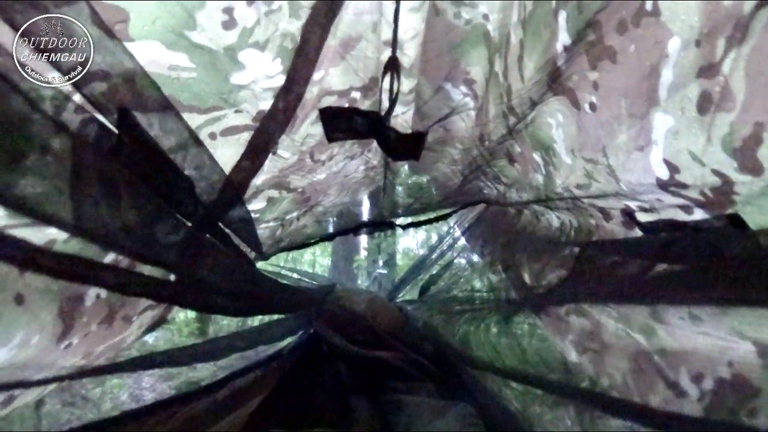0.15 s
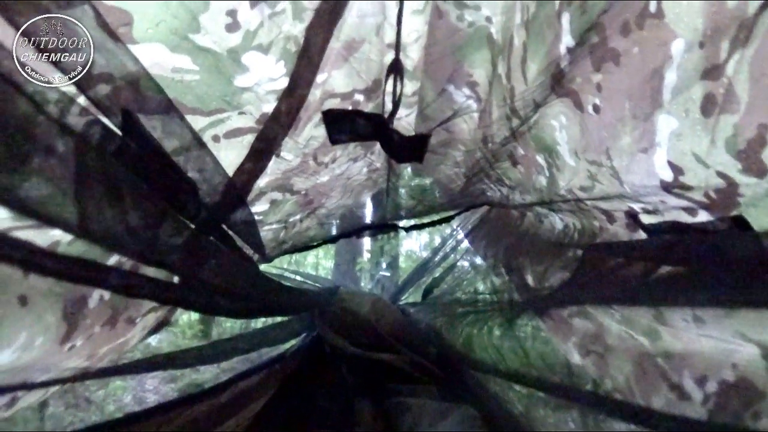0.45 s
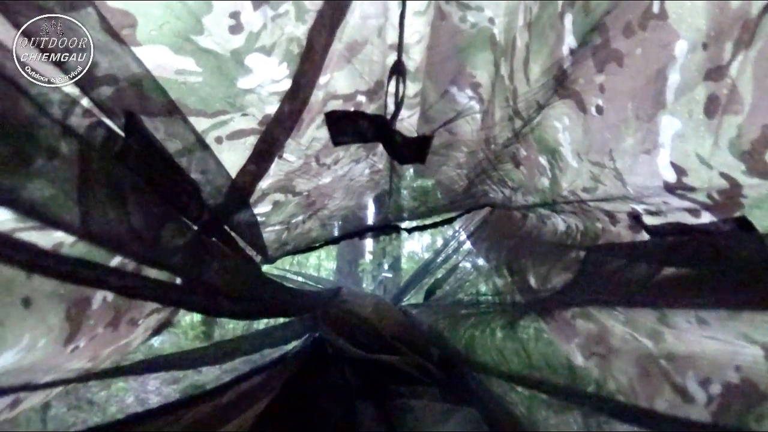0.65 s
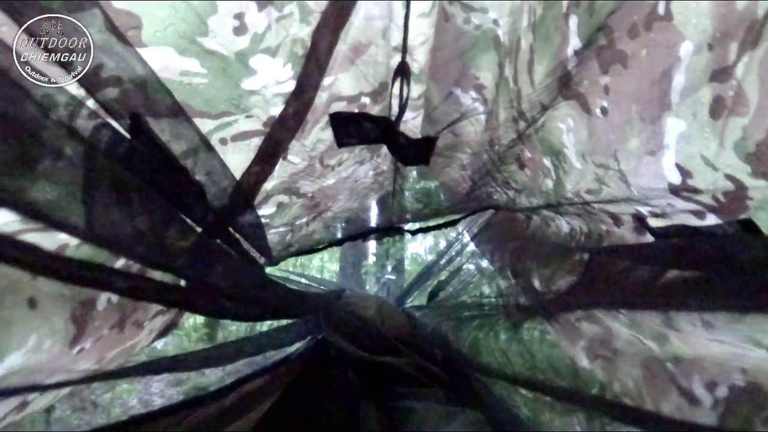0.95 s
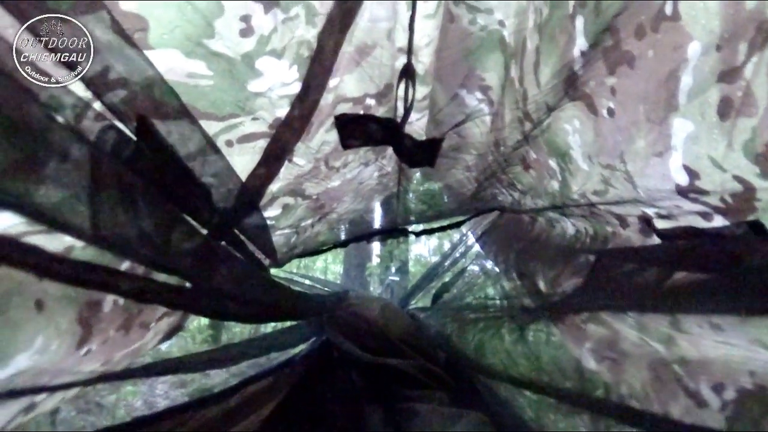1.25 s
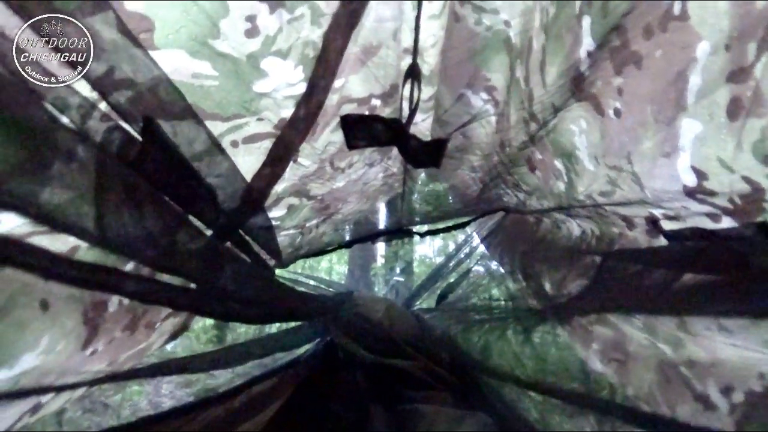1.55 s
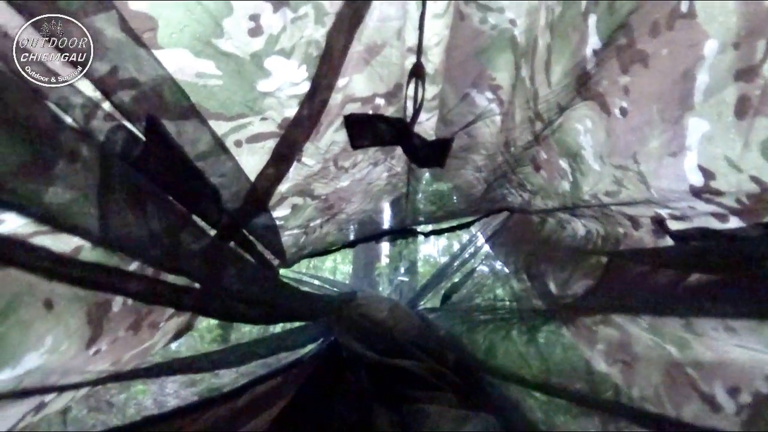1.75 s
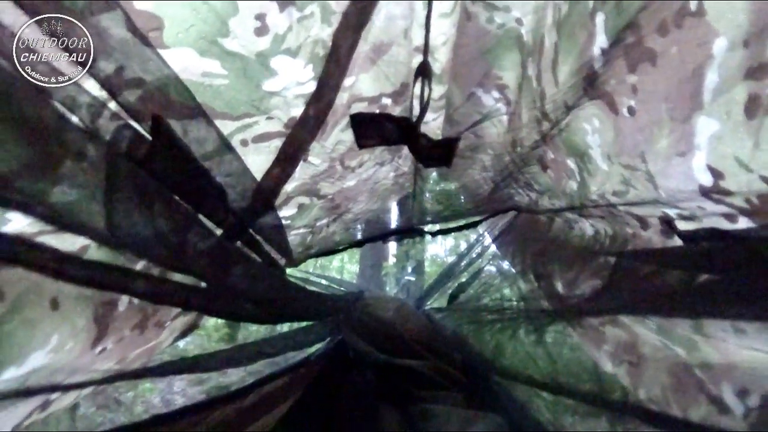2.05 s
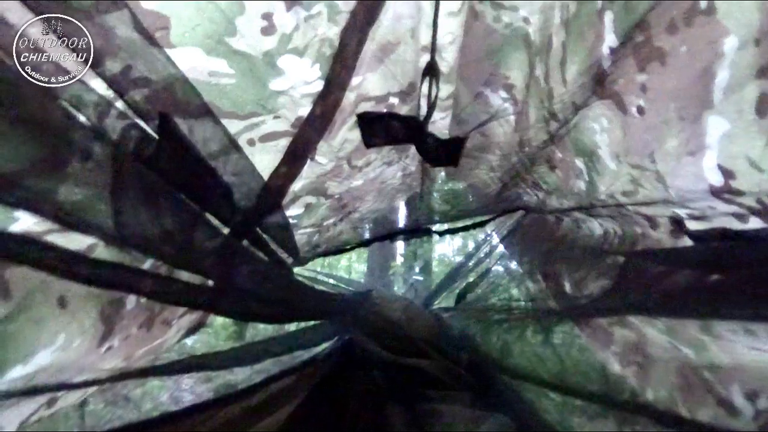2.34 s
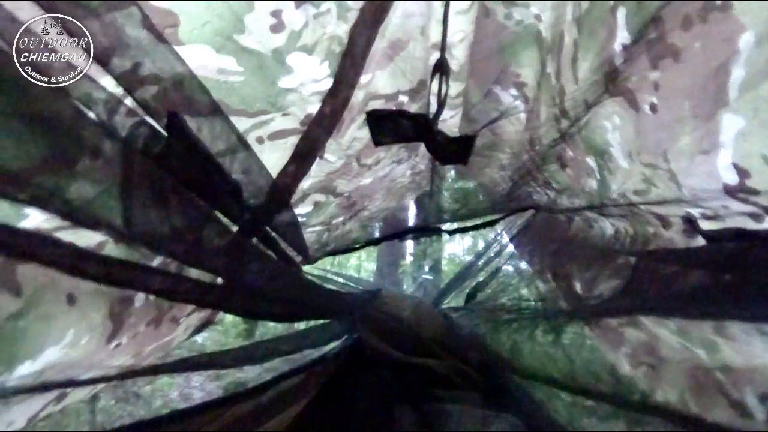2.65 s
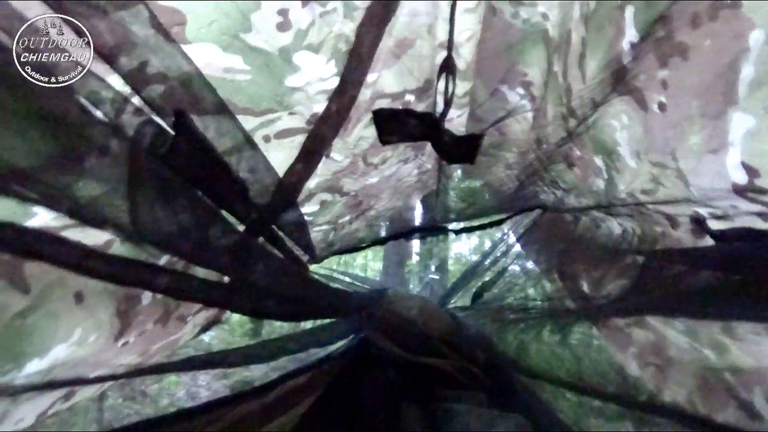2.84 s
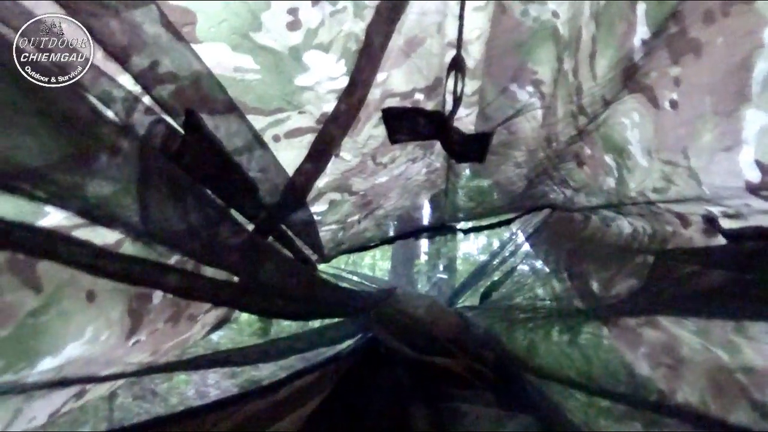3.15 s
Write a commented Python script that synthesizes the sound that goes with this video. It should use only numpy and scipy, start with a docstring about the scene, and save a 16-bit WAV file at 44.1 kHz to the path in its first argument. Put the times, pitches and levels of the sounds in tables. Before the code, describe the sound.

Raindrops tick and patter on a taut tarp, heard from just underneath in a wood. Heavier drips from the trees land now and then with short, crisp taps, while distant light rain hisses faintly throughout.

```python
"""Raindrops tap on a taut tarp just overhead, heard from underneath, with light rain hissing in the wood.
Each drop rings the cloth, snaps its stiff surface and bursts into spray. The cloth is heavily damped,
so a tap has all but died in about 10 ms. Heavy drips off the trees sound the pitch of the spot they hit,
some drops also flap a slacker panel, and fine droplets patter in between."""
import sys
import numpy as np
from scipy import signal
from scipy.fft import rfft, irfft, next_fast_len
from scipy.io import wavfile
from scipy.ndimage import map_coordinates

SR = 44100
rng = np.random.default_rng(int(sys.argv[2]) if len(sys.argv) > 2 else 0)


def log_audio(samples):
    """Write samples as a 16-bit WAV file to the path given in sys.argv[1]."""
    # one column per channel
    frames = np.atleast_2d(samples).T
    # limit to full scale, then quantise
    limited = np.clip(frames, -1, 1)
    pcm = np.round(limited * 32767).astype(np.int16)
    wavfile.write(sys.argv[1], SR, pcm)


N = 145530
TAP_S = 0.04
TAP_TIME = np.arange(int(TAP_S * SR)) / SR


def amp(db):
    """Decibels to gain."""
    return 10 ** (np.asarray(db) / 20)


def unit(x):
    """Scale to rms 1."""
    return x / np.sqrt(np.mean(x ** 2) + 1e-20)


def tap_unit(x, window_s=0.01):
    """Give a tap the energy of rms 1 held for window_s."""
    return unit(x) * np.sqrt(window_s / TAP_S)


def fade(t60):
    """Exponential decay over one tap, 60 dB down after t60 seconds."""
    return np.exp(-np.log(1000) * TAP_TIME / t60)


def along(points, hz):
    """Read a curve of (frequency, value) points on a log frequency axis."""
    point_hz, values = np.transpose(points)
    return np.interp(np.log(hz + 1), np.log(point_hz + 1), values)


def wobble(knots_per_s):
    """A smooth random curve."""
    knots = rng.standard_normal(int(N * knots_per_s / SR) + 4)
    return map_coordinates(knots, [np.arange(N) * knots_per_s / SR])


def filtered(x, response):
    """EQ x with response(hz), a gain per frequency."""
    size = next_fast_len(N + SR // 4)
    hz = np.fft.rfftfreq(size, 1 / SR)
    return irfft(rfft(x, size) * response(hz), size)[..., :N]


def butter(x, edges_hz, kind):
    """A gentle low-, high- or band-pass."""
    sos = signal.butter(2, np.minimum(edges_hz, SR / 2 - 100), kind, fs=SR, output="sos")
    return signal.sosfilt(sos, x)


def stereo_noise(count, width):
    """Left and right white noise for count taps; width is the gain of side against mid."""
    noise = rng.standard_normal((count, 2, len(TAP_TIME)))
    mid, side = noise[:, 0], width * noise[:, 1]
    return np.stack([mid + side, mid - side], axis=1)


def add(track, start_s, sound):
    """Mix a sound into the track."""
    part = track[:, max(round(start_s * SR), 0):][:, :sound.shape[-1]]
    part += sound[..., :part.shape[1]]


def far_rain():
    """Countless far drops on leaves merge into a steady hiss that wavers and flickers a little."""
    # tone of the hiss: f/Hz, relative spectral level/dB
    spectrum = [(30, -19.5), (80, -20.5), (134, -18), (270, -7.5), (450, -4.5), (850, -1.5), (1900, -3.5),
                (3200, -5), (5600, -7.5), (9800, -7), (12000, -17.5), (15500, -22)]
    # how alike the two ears hear it: f/Hz, correlation/0..1
    likeness = [(60, 0.62), (200, 0.97), (950, 0.54), (2400, 0.52), (6000, 0.6), (14000, 1)]

    def mid_side_gains(hz):
        angle = np.arccos(np.clip(along(likeness, hz), -1, 1)) / 2
        return amp(along(spectrum, hz)) * [np.cos(angle), np.sin(angle)]

    mid, side = filtered(rng.standard_normal((2, N)), mid_side_gains)
    hiss = unit(np.array([mid + side, mid - side]))
    waver_db, flicker_db = 1.26 * wobble(8.01), 2 * wobble(250)
    return hiss * amp(-55 + waver_db + flicker_db)


def cloth_ring(pitches_hz, t60, soft_contact=1.86):
    """One damped cloth mode per pitch; the soft drop's push fades out above soft_contact times the pitch."""
    motion = np.sin(2 * np.pi * pitches_hz[:, None] * TAP_TIME) * fade(t60)
    pressure = np.diff(motion, prepend=0)  # the modes push no net air
    rings = [tap_unit(butter(mode, hz * soft_contact, "low")) for hz, mode in zip(pitches_hz, pressure)]
    return np.array(rings)[:, None]


def cloth_crack(centres_hz, octaves, t60, burst, width):
    """Cracks, each in a broad resonance: a burst at first contact, then a brief rattle of the cloth."""
    envelope = fade(t60) + burst * fade(t60=0.0027)
    cracks = butter(stereo_noise(len(centres_hz), width) * envelope, [1460, 13000], "band")
    bands_hz = centres_hz[:, None] * 2 ** (octaves * np.array([-0.5, 0.5]))
    bleed = 0.059  # some of each crack spreads outside its resonance
    return np.array([tap_unit(butter(crack, band, "band") + bleed * crack)
                     for band, crack in zip(bands_hz, cracks)])


def shelter(taps, t60=0.016, delay_s=0.00086, wet_db=-7):
    """The close cloth walls scatter each tap into a tiny tail of its own."""
    onset = np.clip(TAP_TIME / delay_s - 1, 0, 1)
    tails = stereo_noise(len(taps), width=0.5) * fade(t60) * onset
    tails /= np.linalg.norm(tails, axis=-1, keepdims=True)
    scattered = signal.fftconvolve(taps, tails, axes=-1)[..., :len(TAP_TIME)]
    return taps + amp(wet_db) * scattered


def tarp_hits(times, knock_hz, knock_db, snap_hz, snap_db, upper_hz, upper_db, spray_hz, spray_db, pan_db):
    """Each drop rings a low knock and an upper mode of the cloth, snaps its surface and throws spray."""
    gain = lambda db: amp(db)[:, None, None]
    snap_trim_db, spray_trim_db = -1, -0.3
    knock = gain(knock_db) * cloth_ring(knock_hz, t60=0.0045)
    upper = gain(upper_db) * cloth_ring(upper_hz, t60=0.0041)
    snap = gain(snap_db + snap_trim_db) * cloth_crack(snap_hz, octaves=0.56, t60=0.012,
                                                      burst=1.14, width=0.27)
    spray = gain(spray_db + spray_trim_db) * cloth_crack(spray_hz, octaves=0.85, t60=0.02,
                                                         burst=1.1, width=0.094)
    taps = shelter(knock + upper + snap + spray)
    out = np.zeros((2, N))
    for start_s, pan, tap in zip(times, pan_db, taps):
        add(out, start_s, tap * amp([[pan / 2], [-pan / 2]]))
    return out


def small_hits(times, knock_db, snap_db, spray_db, pan_db):
    """Small drops share one set of pitches, detuned by the spot where each lands."""
    detune = np.exp(0.22 * rng.standard_normal((len(times), 3)))
    knock_hz, snap_hz, upper_hz = (detune * [1028, 2665, 4220]).T
    spray_hz = np.full(len(times), 8770)
    upper_db = snap_db - 5.5
    return tarp_hits(times, knock_hz, knock_db, snap_hz, snap_db,
                     upper_hz, upper_db, spray_hz, spray_db, pan_db)


def patter(droplets_per_s=120):
    """Fine droplets land at random all over the tarp, each with a colour of its own."""
    count = int(droplets_per_s * N / SR)
    when, softness = rng.random((count, 2)).T
    snap_scatter, spray_scatter, pan_db = rng.standard_normal((count, 3)).T
    knock_db = -59.5 - 7.5 * np.sqrt(softness)
    snap_db = knock_db + 0.5 + 2.5 * snap_scatter
    spray_db = knock_db - 1 + 2.5 * spray_scatter
    return small_hits(when * N / SR, knock_db, snap_db, spray_db, pan_db)


def raindrops():
    """Single small raindrops tick on the tarp above the patter."""
    # small drops, levels before trim: t/s, knock/dB, snap/dB, spray/dB, left over right/dB
    hits = [(0.0235, -72, -55, -52, -2), (0.1045, -72, -53, -57.0, 4), (0.1353, -51.5, -52.5, -54.5, -1.5),
            (0.2365, -49.5, -48.5, -50, -1), (0.2683, -48, -46.0, -57, 0), (0.3675, -53.5, -52.5, -56, -2),
            (0.4045, -47.0, -49, -55, -3.5), (0.4335, -62, -50, -56, -3), (0.5439, -53, -52, -58, 1),
            (0.8055, -55.5, -54, -63, -6), (0.9518, -47.5, -46.5, -50, -2), (1.0487, -51, -53, -62, -1),
            (1.0748, -47, -49.5, -53, -4.5), (1.1163, -50.5, -42.5, -45, -3.5),
            (1.1568, -49.5, -56, -69, -6.5), (1.1945, -52, -46, -49, 0), (1.2223, -55, -47.5, -49, 2),
            (1.3512, -51.5, -48.5, -52.5, -4), (1.4738, -56, -54, -55.0, -2.5), (1.524, -51, -48, -52, -3),
            (1.5329, -45.5, -45.0, -53, -8), (1.6792, -57.5, -53, -55, -1), (1.7374, -56.5, -49, -48.5, -2),
            (1.7971, -51.5, -47, -45, 0), (1.8568, -45.5, -45.5, -52.5, -5), (1.903, -53, -49, -44.5, -1.5),
            (2.1731, -44, -44, -50.5, 1), (2.2304, -46, -52, -55.5, 2), (2.2815, -54.5, -53.0, -65, -8),
            (2.3175, -48.5, -48.0, -50, 2.5), (2.387, -72, -49.5, -42.5, -1),
            (2.4199, -56.5, -55, -46.0, -2), (2.5615, -53, -53.5, -58, 1), (2.7695, -55.5, -57, -54, -1),
            (2.805, -60.5, -52, -57, -3), (3.165, -53.5, -52, -57, 3), (3.176, -55, -56, -60, -3)]
    return small_hits(*np.transpose(hits))


def panel_flaps(t60=0.013, rise_s=0.0021, trim_db=-0.65):
    """A slack panel gives way and swings for a cycle or two."""
    # low flaps of the panel: t/s, f/Hz, level before trim/dB
    flaps = [(0.2408, 347, -47.5), (0.9538, 322, -49), (0.9855, 277, -45), (1.533, 300, -56),
             (1.5473, 350, -50), (1.5763, 263, -54), (1.8558, 263, -45), (1.9845, 304, -56),
             (2.4875, 355, -52.5), (2.687, 447, -47.5), (2.9052, 290, -53)]
    envelope = fade(t60) * (1 - np.exp(-TAP_TIME / rise_s))
    out = np.zeros((2, N))
    for start_s, hz, db in flaps:
        swing = np.sin(2 * np.pi * hz * TAP_TIME) * envelope
        flap = butter(swing, 178, "high")  # any lower and the air just slips round the panel
        add(out, start_s - rise_s / 2, amp(db + trim_db) * tap_unit(flap))
    return out


def tree_drips():
    """Heavy drips fall off the trees and sound the pitch of the spot they hit."""
    # heavy drips, levels before trim: t/s, knock/Hz, knock/dB, snap/Hz, snap/dB,
    # upper mode/Hz, upper mode/dB, spray/Hz, spray/dB, left over right/dB
    drips = [(0.6192, 1670, -41, 2280, -43.5, 3700, -54, 7500, -41, 0),
             (0.9843, 960, -42.5, 3020, -37, 3750, -41.5, 8600, -37.5, -3),
             (1.018, 1070, -40, 2220, -42.5, 3350, -42, 7900, -33.5, 0),
             (1.5468, 1114, -30.5, 2980, -40.5, 3700, -38.5, 9900, -41.5, 1.5),
             (1.575, 1090, -48.5, 3200, -45.5, 4360, -47, 8800, -40, 0),
             (1.984, 1070, -44, 2830, -44, 4630, -40, 10500, -37.5, 0.5),
             (2.1803, 1360, -43, 5000, -39.5, 4370, -42, 7700, -35.5, -1),
             (2.4877, 1010, -34, 2350, -34, 4380, -41.5, 8600, -44.5, -4.5),
             (2.9037, 763, -33.5, 2600, -35.5, 4390, -34.5, 10100, -37.5, -0.5),
             (3.1008, 1170, -40, 2490, -47.5, 4400, -47, 9100, -52.5, 4)]
    return tarp_hits(*np.transpose(drips))


def scene():
    """Drips, flaps, raindrops and patter on the tarp over a bed of far rain."""
    return far_rain() + tree_drips() + panel_flaps() + raindrops() + patter()


def record(dry, top_hz=16200):
    """A brick-wall high cut takes off the very top."""
    return filtered(dry, lambda hz: hz < top_hz)


dry = scene()
out = record(dry)
log_audio(out)
```